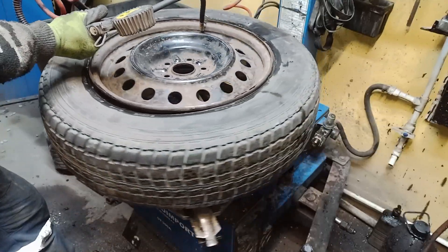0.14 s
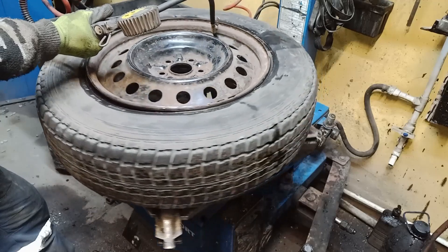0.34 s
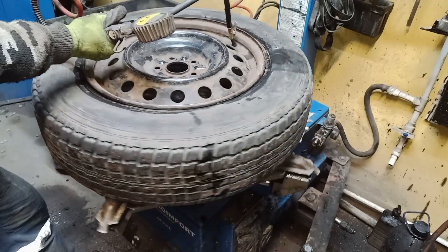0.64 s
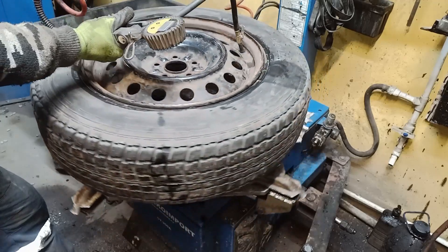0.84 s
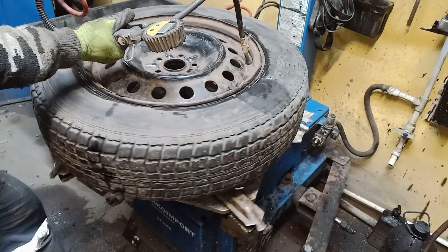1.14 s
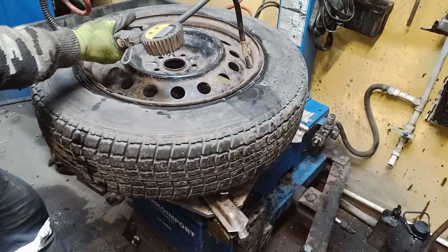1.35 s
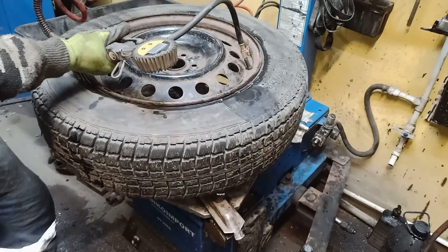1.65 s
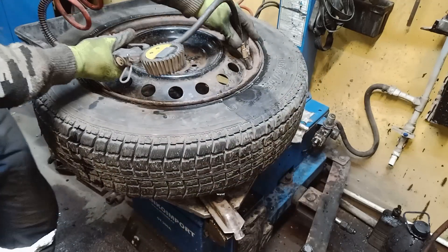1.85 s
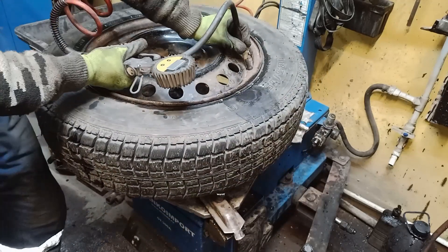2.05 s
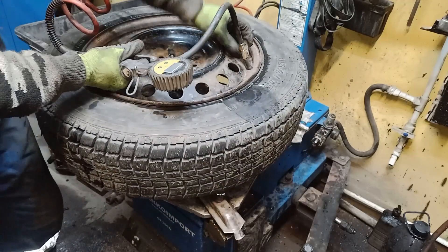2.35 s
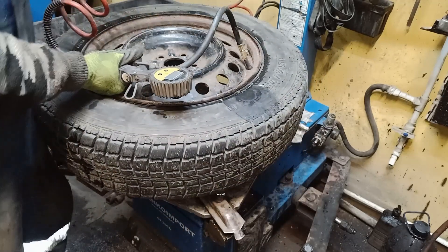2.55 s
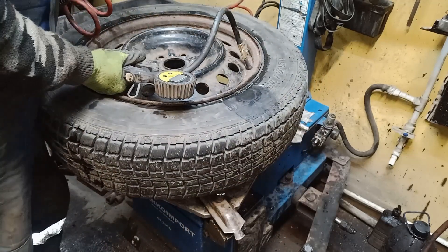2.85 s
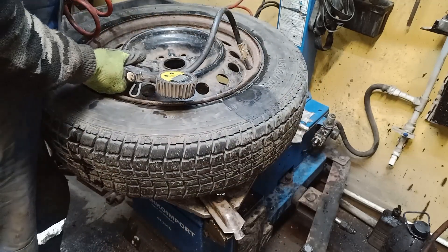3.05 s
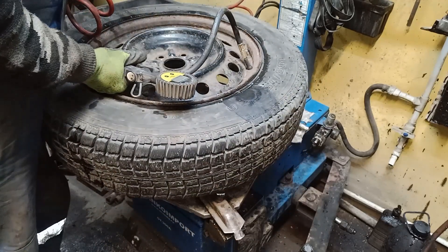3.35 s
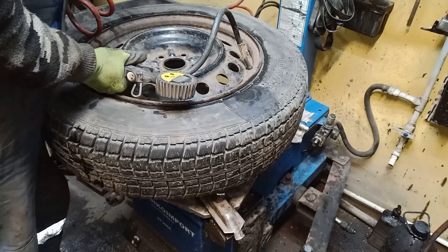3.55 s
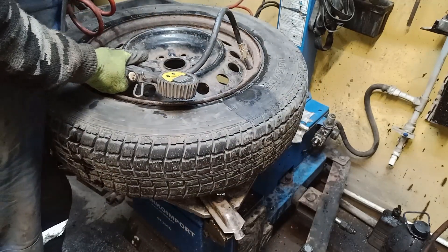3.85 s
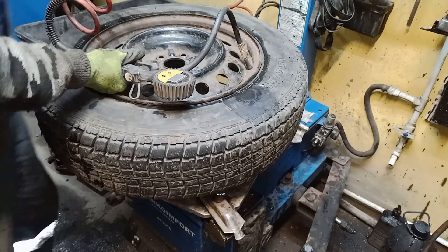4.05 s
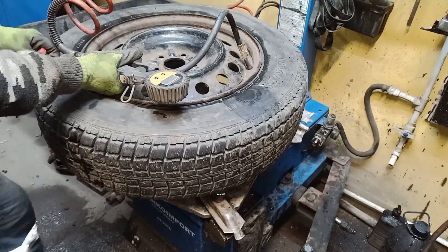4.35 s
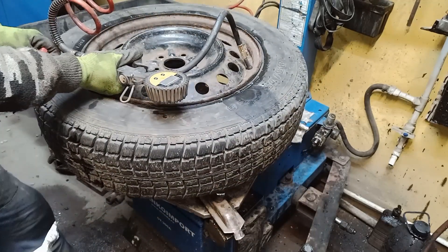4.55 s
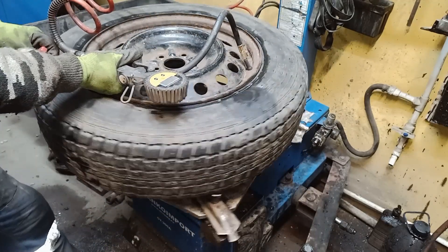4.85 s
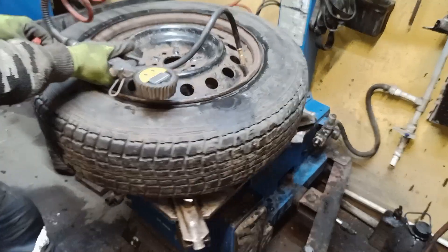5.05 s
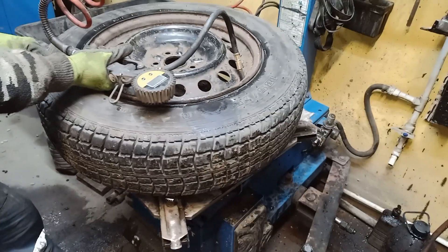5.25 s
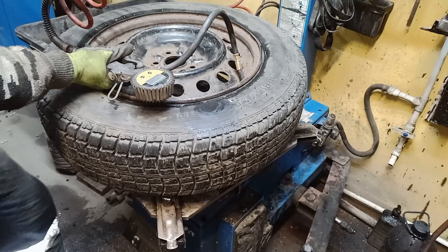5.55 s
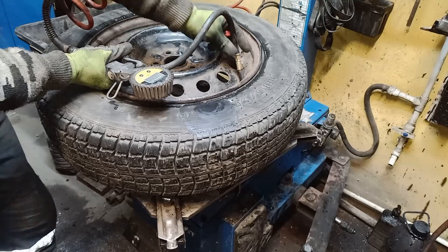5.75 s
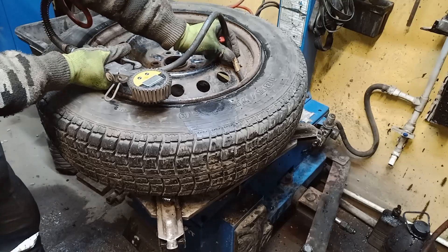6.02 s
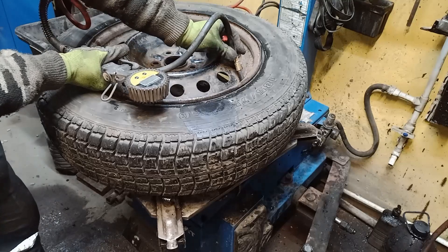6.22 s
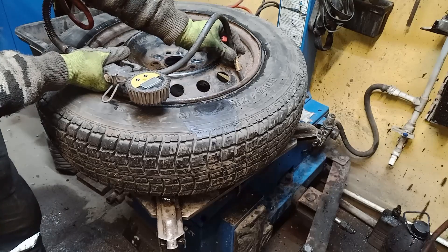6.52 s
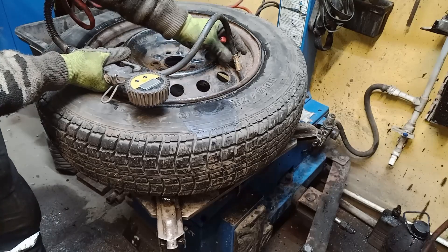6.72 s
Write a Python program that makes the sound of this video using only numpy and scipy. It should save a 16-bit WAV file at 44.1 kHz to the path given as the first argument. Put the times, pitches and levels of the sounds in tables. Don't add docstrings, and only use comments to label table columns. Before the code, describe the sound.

Bright airy hiss and a motor hum, a hard clanging pop as a tyre seats on its steel rim, then steady hissing with small scuffs.

```python
import sys
import numpy as np
from scipy import signal
from scipy.fft import rfft, irfft, next_fast_len
from scipy.io import wavfile
from scipy.ndimage import uniform_filter1d

SR = 44100
rng = np.random.default_rng(int(sys.argv[2]) if len(sys.argv) > 2 else 0)


def voltage_ratio(level):
    return 10 ** (np.asarray(level, float) / 20)


def log_audio(samples):
    frames = np.atleast_2d(samples).T
    limited = np.clip(frames, -1, 1)
    pcm = np.round(limited * 32767).astype(np.int16)
    wavfile.write(sys.argv[1], SR, pcm)


N = 303403
T = np.arange(N) / SR
SIZE = next_fast_len(N)
HZ = np.arange(SIZE // 2 + 1) * SR / SIZE + 1


def tone(points):
    hz, db = np.transpose(points)
    return voltage_ratio(np.interp(np.log(HZ), np.log(hz), db, left=-120, right=-120))


def peaks(rows, narrow=0.79):
    power = 0
    for hz, wide, db in rows:
        power = power + voltage_ratio(2 * db) / (1 + (2 * (HZ - hz) / (narrow * wide)) ** 2) ** 2
    return np.sqrt(power)


def noise(gain, lo, hi):
    z = rfft(rng.standard_normal(SIZE)) * gain
    inside = (HZ > lo) & (HZ < hi)
    power = 2 * np.sum(np.abs(z[inside]) ** 2) / SIZE ** 2
    return irfft(z, SIZE)[:N] / np.sqrt(power)


def walk(rate):
    k = int(SR / rate)
    steps = np.repeat(rng.standard_normal(N // k + 1), k)
    drift = uniform_filter1d(uniform_filter1d(steps, k), k)[:N]
    return drift / drift.std()


def turbulent(gain, lo, hi, shared_db, own_db, rate):
    spectrum, shared, out = rfft(noise(gain, lo, hi), SIZE), walk(rate), 0
    place = np.log2(HZ / 60) * 1.5
    for band in range(-1, 14):
        share = np.cos(np.pi / 2 * np.clip(place - band, -1, 1)) ** 2
        flutter = voltage_ratio(shared_db * shared + own_db * walk(2 * rate))
        out = out + irfft(spectrum * share, SIZE)[:N] * flutter
    return out


def even(x, s):
    return x / np.sqrt(uniform_filter1d(x ** 2, int(s * SR)) + 1e-9)


def spell(s, held, rise, t60, sag_db=0.):
    t = T - s
    swell = np.exp(np.minimum(t, 0) / abs(rise) * 3)
    return swell * voltage_ratio(-sag_db * np.clip(t, 0, held) - 60 * np.maximum(t - held, 0) / abs(t60))


def whisper():
    return voltage_ratio(-85 + 2.5 * walk(6.)) * noise(peaks([(12400, 3000, 0)]), 0, SR)


# multiple of the shaft rate, rms level in dB.
COMPRESSOR_TONES = [(3, -68.5), (5, -68), (9, -76), (11, -78), (14, -74), (16, -72)]


def compressor():
    shaft_hz = 35.85
    turn = 2 * np.pi * (shaft_hz * T + np.cumsum(0.19 * walk(5.9)) / SR)
    out = 0
    for k, db in COMPRESSOR_TONES:
        out = out + np.sqrt(2) * voltage_ratio(db + 1.3 * walk(14)) * np.sin(k * turn + k)
    return out


# frequency in Hz, level in dB per Hz.
GEAR_TONE = [(20, -18), (40, -9.5), (80, 2.5), (150, 3.5), (250, 4.5), (400, -8.5), (650, -1.5),
             (950, -7.5), (1500, -6.5), (3000, -12.5), (4000, -30)]
# frequency in Hz, width in Hz, level in dB.
HOUSING_RINGS = [(404, 62, -3), (659.4, 44, 2), (785, 21, 3.5), (833, 32, -2), (1107, 26, -4.5),
                 (1307, 170, -8.5), (1350, 26, -9), (1741, 45, -2), (1890, 42, -18), (1884, 47, -5.5),
                 (2060, 30, -19), (2210, 55, -17), (2500, 43, -2), (2700, 16, -7), (2810, 32, -41),
                 (3080, 57, -2)]
# motor pulls in seconds, lets go in seconds, hum in dB, gears in dB,
# how much earlier the gears catch in seconds.
PEDAL_PRESSES = [
    (0., 1.165, -0.5, -49.5, .001),
    (4.967, 5.06, 0, -46, .042),
]
HUM_LEVELS = [-37, -37, -50.5]
HUM_LINGER = [.001, 0.031, .001]
# time in seconds, dB added to the lowest hum.
MOTOR_STRAIN = [(0, 1.5), (.14, -2.5), (.2, -7), (.36, -1.5), (.6, -0.2), (1.05, 1.7), (1.16, 4),
                (4.97, -4), (5.05, 2.5)]


def motor():
    hum_hz, hum_rise_s, hum_t60_s = 100, 0.022, 0.091
    gear_t60_s, gear_gain_db_per_s = 0.37, 2
    garage_db, garage_t60_s = -16, 1.35
    turn = 2 * np.pi * hum_hz * (T - .0017) + 0.031 * walk(4.6)
    hum = 0
    for k in range(3):
        pull = 0
        for on, off, db, _, _ in PEDAL_PRESSES:
            pull = pull + voltage_ratio(db) * spell(on, off - on + HUM_LINGER[k], hum_rise_s, hum_t60_s)
        pull = pull * voltage_ratio(HUM_LEVELS[k])
        if k == 0:
            pull = pull * voltage_ratio(np.interp(T, *np.transpose(MOTOR_STRAIN)))
        waver = voltage_ratio((.5 + 0.25 * k) * walk(18.0))
        hum = hum - np.sqrt(2) * pull * waver * np.cos((k + 1) * turn)

    gears = 0
    for on, off, _, db, lead in PEDAL_PRESSES:
        held = off - on + lead + 0.038
        gears = gears + voltage_ratio(db) * spell(on - lead, held, 0.0067, gear_t60_s, -gear_gain_db_per_s)
        gears = gears + voltage_ratio(db + garage_db) * spell(off, 0, 0.042, garage_t60_s)
    gain = np.sqrt(tone(GEAR_TONE) ** 2 + voltage_ratio(2 * 2.0) * peaks(HOUSING_RINGS, 0.54) ** 2)
    rumble = turbulent(gain, 330, 1140, shared_db=-0.28, own_db=.5, rate=10.0)
    dull = irfft(rfft(rumble, SIZE) / np.sqrt(1 + (HZ / 1760.0) ** 4), SIZE)[:N]
    rumble = np.where(T < 3, rumble, dull)
    return hum + gears * rumble * (1 + 0.048 * np.cos(turn))


# time in seconds, peak in dB, centre in Hz,
# rise in seconds, 60 dB decay in seconds.
BRUSH_STROKES = [(1.185, -42, 500, .01, 0.23), (2.269, -51.5, 1200, .01, .41),
                 (2.29, -49.5, 4270, .011, 0.38), (2.335, -52, 1210, .005, 0.07),
                 (4.14, -61, 1900, .025, 0.47), (4.045, -52, 3300, .008, .2), (4.38, -54, 2300, 0.027, .3),
                 (4.686, -51, 480, .003, 0.26), (4.75, -56.5, 400, 0.022, 0.32),
                 (4.927, -40, 704, 0.0042, 0.33), (5.085, -46, 650, .02, .3), (5.669, -53, 1200, .004, .13),
                 (5.77, -48.5, 2840, 0.08, 0.33), (5.81, -55, 1000, 0.13, 0.17),
                 (5.82, -45, 4300, 0.071, 0.15)]
# time in seconds, peak in dB, rise in seconds, 60 dB decay in seconds.
AIR_PUFFS = [
    (.04, -37.5, 0.057, 0.54),
    (2.3, -39.5, .015, .15),
    (4.046, -38.5, 0.0087, .19),
    (4.928, -27.5, 0.0095, 0.24),
    (5.8, -40, 0.079, .5),
]
# time in seconds, level in dB, centre in Hz, width in Hz,
# 60 dB decay in seconds.
RUB_RINGS = [
    (1.918, -29, 335, 120, 0.24),
    (2.06, -56, 83, 50, .3),
    (4.927, -39, 190, 260, 0.28),
    (2.5, -70.5, 1100, 130, 2.3),
    (4.59, -58, 110, 60, .25),
]


def scuffs():
    rows = [(s, db, hz, 1.28 * hz, rise, t60) for s, db, hz, rise, t60 in BRUSH_STROKES]
    rows += [(s, db, 5130, 1750, rise, t60) for s, db, rise, t60 in AIR_PUFFS]
    rows += [(s, db, hz, wide, .004, t60) for s, db, hz, wide, t60 in RUB_RINGS]
    out = np.zeros(N)
    for s, db, hz, wide, rise, t60 in rows:
        no_bass = np.minimum(2.26 * HZ / hz, 1) ** 3
        grain = even(noise(peaks([(hz, wide, 0)]) * no_bass, 0, SR), .01)
        out += voltage_ratio(db + 1.5 * walk(120.)) * spell(s, 0, rise, t60) * grain
    return out


# frequency in Hz, level in dB per Hz.
JET_TONE = [(120, -61.5), (200, -26.5), (464, -24), (508, -26), (760, -31.5), (1410, -18.5), (1670, -16.5),
            (2730, -15.5), (5570, 0), (6570, -2), (8030, -19.5), (11000, -20.5), (13400, -22), (15000, -12),
            (15800, -9)]
# fully open in seconds, held in seconds, level in dB,
# brightness in dB, opening time in seconds.
BEAD_GAPS = [
    (0., 1.912, -52, 14.5, .01),
    (1.1, 0.68, -67, -4, .1),
    (1.917, .001, -46.5, -8, .002),
    (2.03, .005, -57.5, 17, 0.13),
    (4.927, .003, -49, 12, .004),
    (5.07, .006, -53.5, 4, .012),
    (5.155, 0.787, -61.5, 11, 0.067),
    (5.82, 0.016, -69, 1, 0.1),
    (5.95, .02, -63, 12, 0.028),
]


def leak():
    flow, bright = 0, 0
    for s, held, db, bright_db, rise in BEAD_GAPS:
        gap = voltage_ratio(db) * spell(s, held, rise, .11)
        flow = flow + gap
        bright = bright + gap * voltage_ratio(bright_db)
    top = 1 / (1 + (13900 / HZ) ** 40)
    gain = tone(JET_TONE)
    body = turbulent(gain * (1 - top), 8360, 14040, shared_db=.5, own_db=1.0, rate=14.)
    edge = noise(gain * top, 14200, 16210) * voltage_ratio(1.1 * walk(12.))
    return voltage_ratio(.3 * walk(3.75)) * (flow * body + bright * edge)


# frequency in Hz, level in dB.
RIM_MODES = [(324, -5), (423, -2), (458, -2), (578, -0.5), (675, 0), (797, 1.5), (891, 4.5), (926, 3.5),
             (988, 2), (1043, -14), (1174, -23), (1239, -5), (1294, -11), (1440, -27), (1707, -12),
             (2353, -18), (2568, -27), (2767, -6), (2999, -1), (3241, -6.5), (3365, -27), (3580, -13)]
# frequency in Hz, level in dB per Hz.
POP_COLOUR = [(24, -65), (40, -30), (263, -9.5), (321, -6), (369, -15), (418, -4.5), (488, -4.5), (904, -7),
              (1600, -11.5), (2080, -52), (3520, -120)]
# time in seconds, peak in dB.
BEAD_JOLTS = [(1.916, -12), (1.942, -17), (1.955, -16.5), (1.964, -22), (1.982, -21), (1.991, -30),
              (2.006, -23), (2.031, -25), (2.044, -20.5)]
# time in seconds, held in seconds, body in dB, rim edge in dB,
# 60 dB decay in seconds.
BEAD_SEATING = [
    (1.918, .004, -19.5, -23.5, 0.12),
    (1.96, 0.08, -23, -29.5, 0.29),
]
SEATING_RISE = [0.0026, 0.02]


def bead():
    body_gain, edge_gain = 0, 0
    for (s, held, body_db, edge_db, t60), rise in zip(BEAD_SEATING, SEATING_RISE):
        blow = spell(s, held, rise, t60, 83)
        body_gain = body_gain + voltage_ratio(body_db) * blow
        edge_gain = edge_gain + voltage_ratio(edge_db) * blow
    rings = peaks([(hz, 20, db) for hz, db in RIM_MODES])
    body = noise(tone(POP_COLOUR) * (.5 + rings), 250, 1300)
    edge = noise((voltage_ratio(-13.0) + rings) / (1 + (1700 / HZ) ** 8) / (1 + (HZ / 4000) ** 6), 1600, 3700)
    out = body_gain * even(body, .012) + edge_gain * even(edge, 0.014)

    t = T[:SR // 10]
    knock = np.zeros(len(t))
    for k, (hz, db) in enumerate(RIM_MODES):
        knock += (-1) ** k * voltage_ratio(db) * np.sin(2 * np.pi * hz * t) * min(710.0 / hz, 1)
    high_pass = signal.butter(2, 230, "high", fs=SR, output="sos")
    knock = signal.sosfilt(high_pass, knock * np.exp(-t / 0.0035))
    for s, db in BEAD_JOLTS:
        i = int(s * SR)
        out[i:i + len(t)] += voltage_ratio(db) * knock / np.abs(knock).max()

    ring_s, ring_held_s = 2.05, 0.28
    ring_hz = 212 + 9.8 * np.clip(T - ring_s, 0, ring_held_s)
    turn = 2 * np.pi * np.cumsum(ring_hz) / SR
    air_ring = np.sin(turn) + voltage_ratio(-14.0) * np.sin(.68 * turn)
    ring_gain = voltage_ratio(-44) * spell(ring_s, ring_held_s, 0.034, 0.46, 37)
    return out + np.sqrt(2) * ring_gain * air_ring


# frequency in Hz, wander in Hz, level in dB over the hiss.
CORE_WHISTLES = [(4634, 25, -15)]
EARLY_WHISTLES = [(10300, 35, -43), (11020, 25, -43)]
LATE_WHISTLES = [(7800, 30, -35), (14060, 35, -42)]


def whistle():
    def thin(rows):
        out = 0
        for hz, wander_hz, db in rows:
            turn = 2 * np.pi * np.cumsum(hz + wander_hz * walk(30.)) / SR
            out = out + voltage_ratio(db + 2.8 * walk(9.)) * np.sin(turn)
        return out
    shift_s = 4.92
    changing = np.where(T < shift_s, thin(EARLY_WHISTLES), thin(LATE_WHISTLES))
    return np.sqrt(2) * (thin(CORE_WHISTLES) + changing)


# time in seconds, level in dB.
AIR_FLOW = [(0, -43.5), (1, -36.5), (1.3, -39), (1.91, -40), (1.93, -31.5), (2.05, -37.5), (2.12, -42),
            (2.32, -42.5), (3.5, -44.5), (4.9, -43), (5.03, -46.5), (5.07, -37.5), (5.14, -44.5),
            (5.2, -42), (5.64, -43.5), (5.9, -46), (6.4, -40.5), (6.88, -43.5)]
# frequency in Hz, level in dB per Hz.
HISS_TONE = [(1470, -63), (2500, -18), (3430, -15.5), (3760, -10.5), (4260, -8.5), (4460, -7.5), (4710, 0),
             (5750, -3), (9570, -32), (10700, -35.5), (13300, -54), (15100, -21), (15800, -16)]
# frequency in Hz, width in Hz, level in dB.
WHEEL_RINGS = [(2692, 20, -20), (2745, 43, -19), (2907, 41, -19), (3004, 48, -21), (3112, 31, -18),
               (3230, 61, -18), (3381, 39, -19), (3488, 33, -17), (3650, 50, -12), (3854, 29, -10),
               (3919, 35, -13), (4048, 42, -9), (4307, 41, -13), (4360, 32, -13), (4447, 23, -8),
               (4576, 81, 0), (4856, 26, -4), (4942, 36, -10), (5071, 45, -4), (5286, 25, -6),
               (5351, 66, -6), (5437, 23, -6), (5566, 35, -5), (5685, 80, -4), (5868, 25, -9),
               (5997, 52, -11), (6137, 33, -14), (6245, 26, -15)]
# frequency in Hz, width in Hz, level in dB.
VALVE_RINGS = [(6580, 95, 0), (6958, 60, -5), (7205, 50, -4), (7373, 40, -9), (7800, 60, -10),
               (8227, 30, -14), (8330, 40, -11), (8392, 40, -13), (9001, 50, -20), (10298, 30, -13),
               (11020, 22, -12), (11714, 150, -26), (13587, 150, -29), (14061, 60, -20), (15695, 50, -6)]
# frequency in Hz, width in Hz, level in dB.
CAVITY_RINGS = [(880, 29, -24.5), (1083, 51, -18.5), (1152, 15, -41), (1395, 22, -11), (1447, 15, -2.5),
                (1567, 26, -7.5), (1630, 45, -8), (1746, 26, -4), (1870, 29, -10), (2036, 54, -6),
                (2110, 18, -13), (2200, 36, -4), (2330, 22, -5), (2377, 9.5, 0), (2740, 17, -14)]
# frequency in Hz, level in dB per Hz.
DRONE_TONE = [(12, -45), (20, 3), (54, -6), (180, 2), (240, -3.5), (319, -2), (453, -4.5), (567, 0),
              (741, -16.5), (1160, -19.5), (1490, -1), (1900, -8.5), (2070, -1), (2700, -25), (3510, -20),
              (5940, -120)]
# time in seconds, level in dB.
CASING_LEVEL = [(0.0, -60), (6.88, -59)]


def fill():
    rings = peaks(WHEEL_RINGS, 0.73) ** 2 + voltage_ratio(2 * -13.) * peaks(VALVE_RINGS, 0.66) ** 2
    hiss_gain = np.sqrt(voltage_ratio(2 * -9.) * tone(HISS_TONE) ** 2 + rings)
    hiss = turbulent(hiss_gain, 2400, 11000, shared_db=0.0, own_db=0.57, rate=15.0)
    casing_gain = np.sqrt(voltage_ratio(2 * -9.) * tone(DRONE_TONE) ** 2 + peaks(CAVITY_RINGS, 0.88) ** 2)
    drone = turbulent(casing_gain, 60, 3000, shared_db=-1.1, own_db=.5, rate=8.)
    flow = voltage_ratio(np.interp(T, *np.transpose(AIR_FLOW)))
    return flow * (hiss + whistle()) + voltage_ratio(np.interp(T, *np.transpose(CASING_LEVEL))) * drone


def scene():
    duck = voltage_ratio(-4. * spell(2.106, 0.098, .1, 0.37))
    background = duck ** 2 * whisper() + compressor()
    mono = background + motor() + scuffs() + leak() + bead() + duck * fill()
    return np.array([mono, mono])


def roll_off(x):
    return signal.sosfilt(signal.butter(12, 17120, fs=SR, output="sos"), x)


def record(dry):
    low_pass = signal.ellip(12, .2, 80, 15720, fs=SR, output="sos")
    return roll_off(signal.sosfilt(low_pass, dry))


dry = scene()
out = record(dry)
log_audio(out)
```